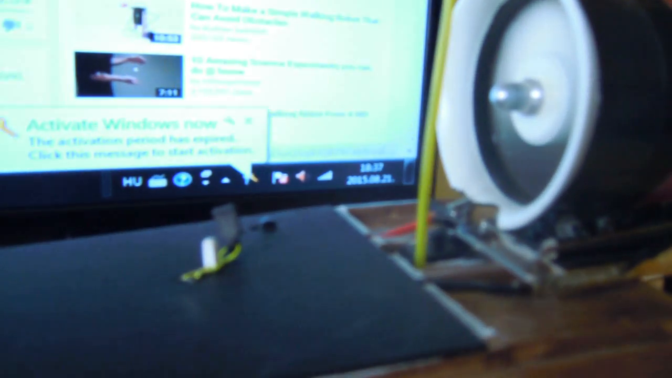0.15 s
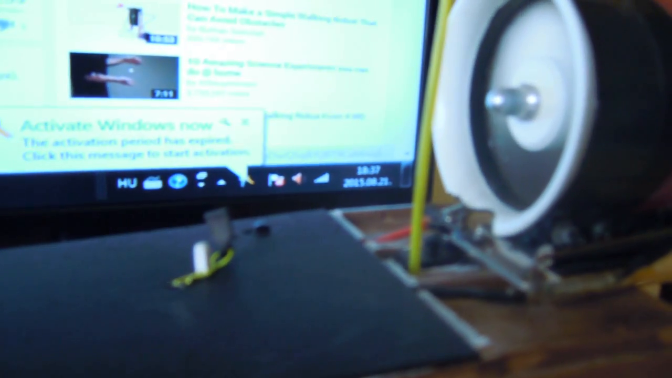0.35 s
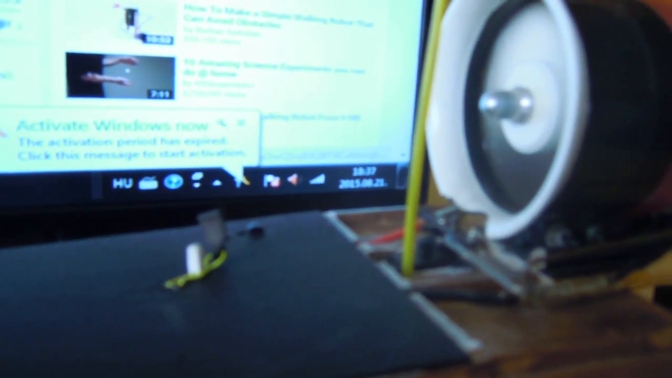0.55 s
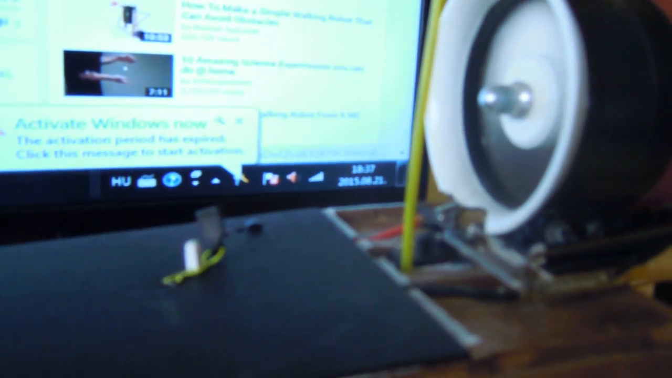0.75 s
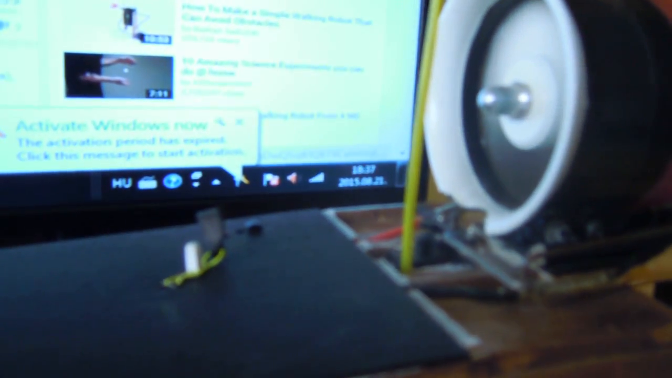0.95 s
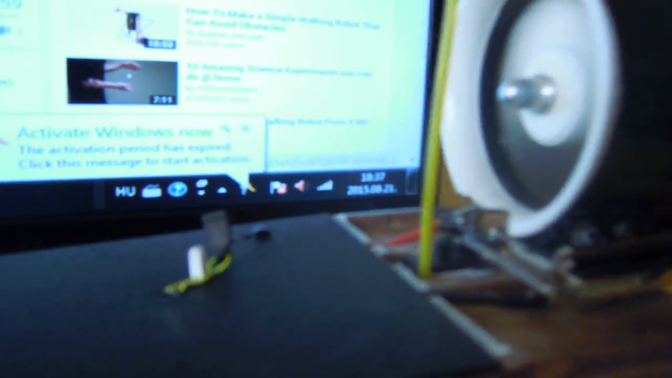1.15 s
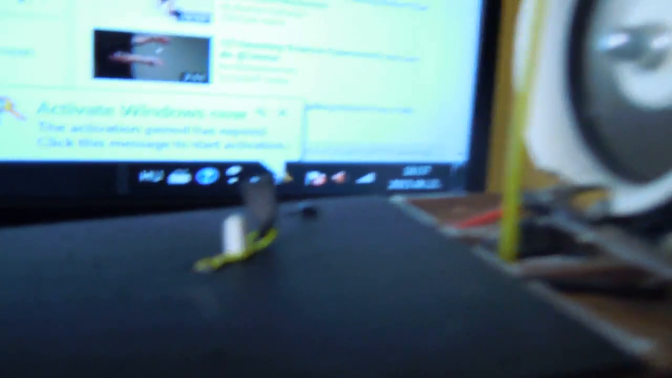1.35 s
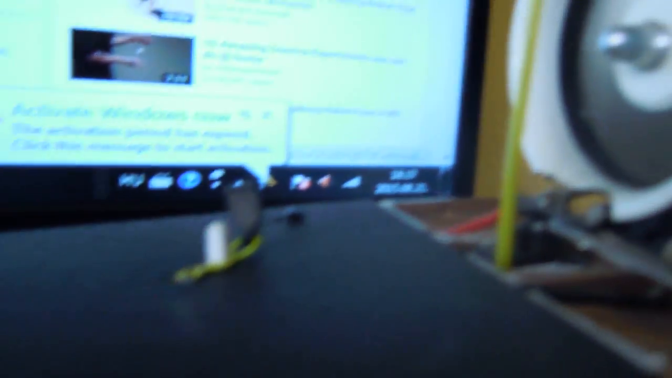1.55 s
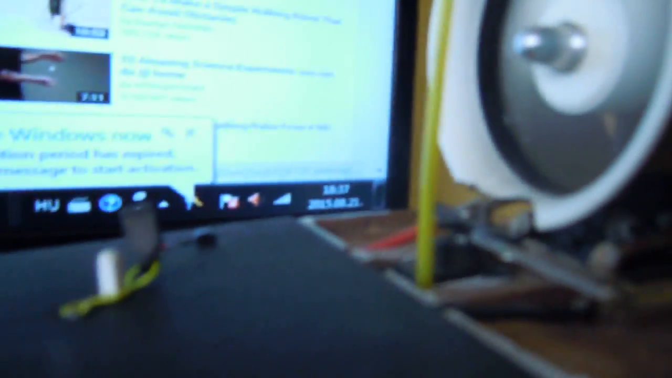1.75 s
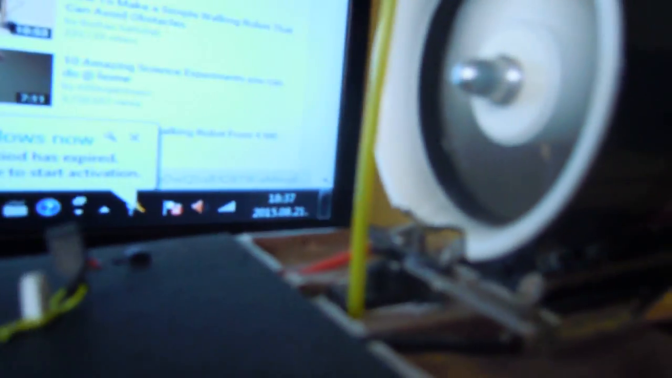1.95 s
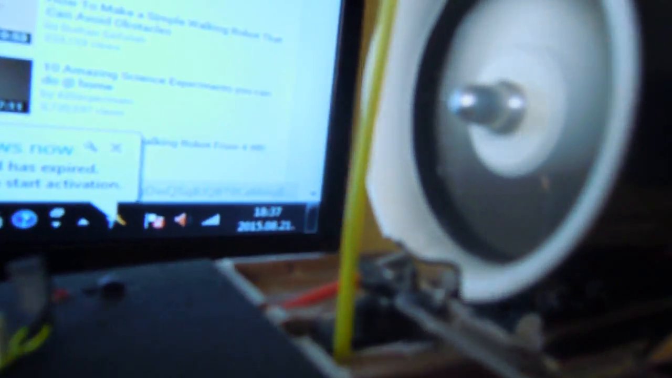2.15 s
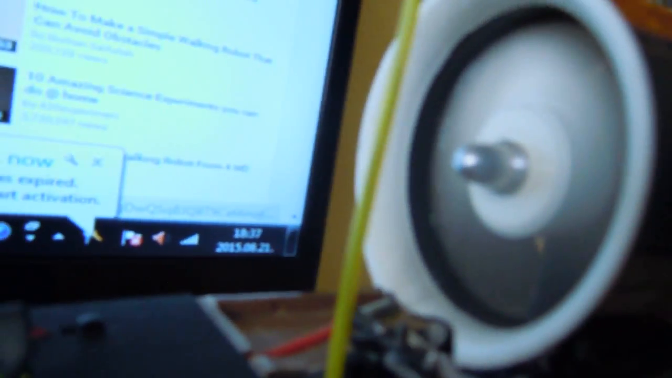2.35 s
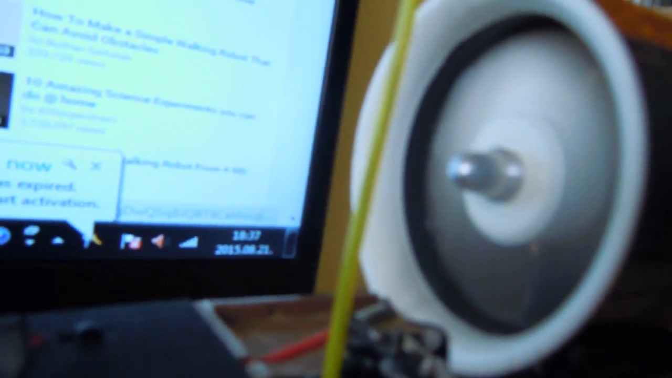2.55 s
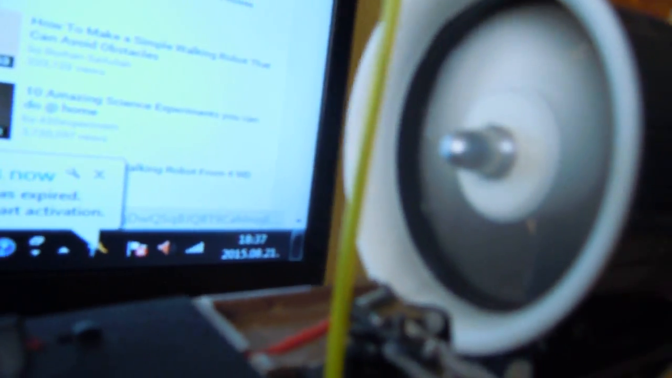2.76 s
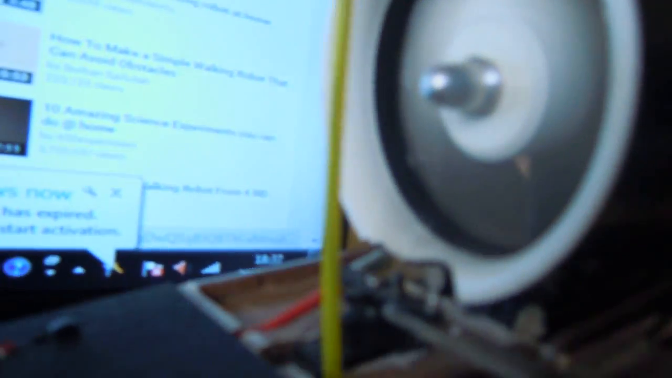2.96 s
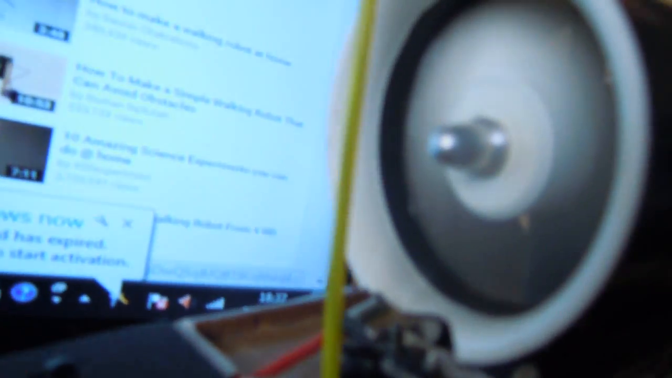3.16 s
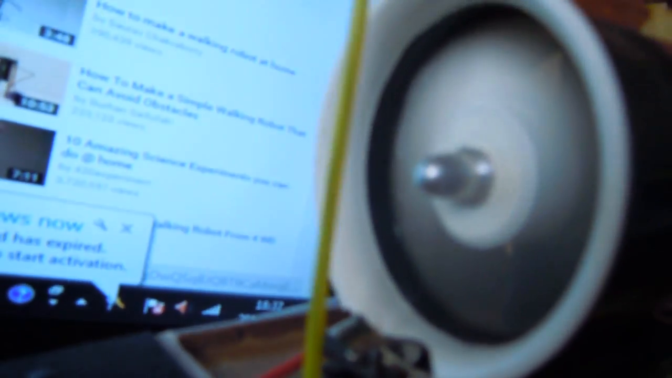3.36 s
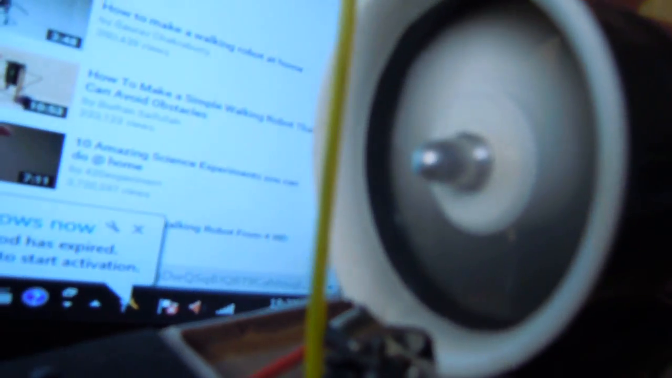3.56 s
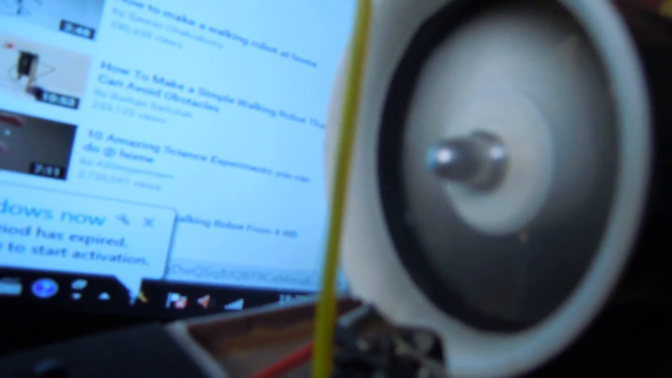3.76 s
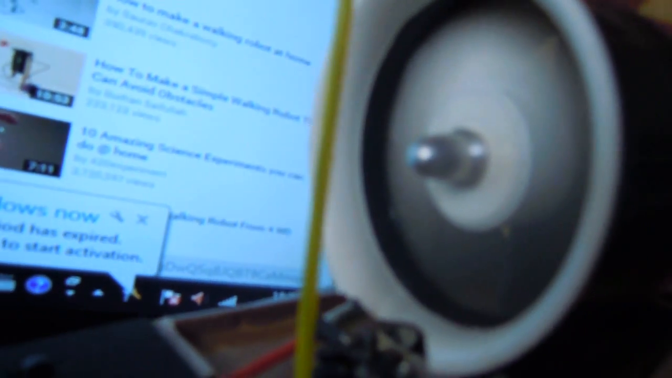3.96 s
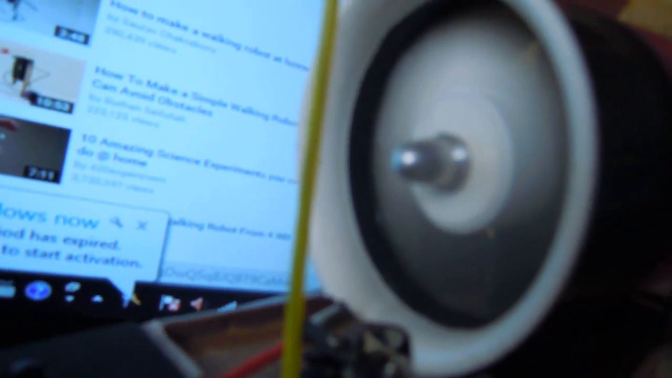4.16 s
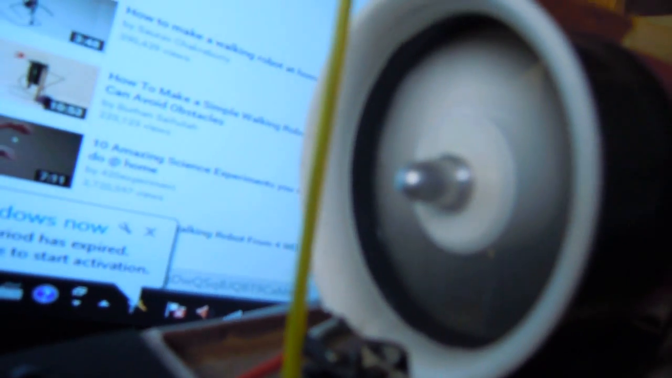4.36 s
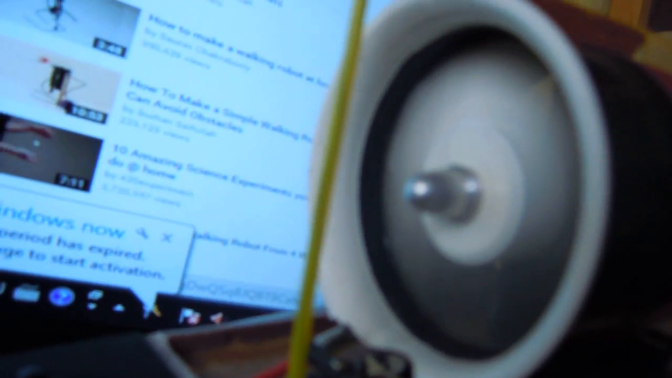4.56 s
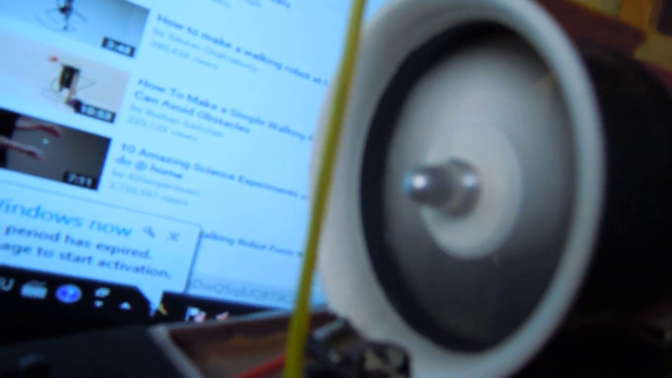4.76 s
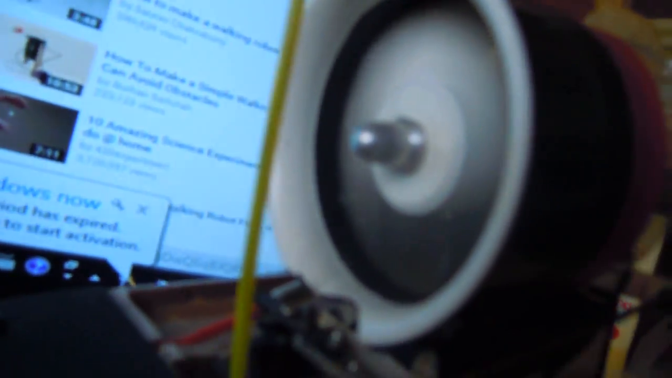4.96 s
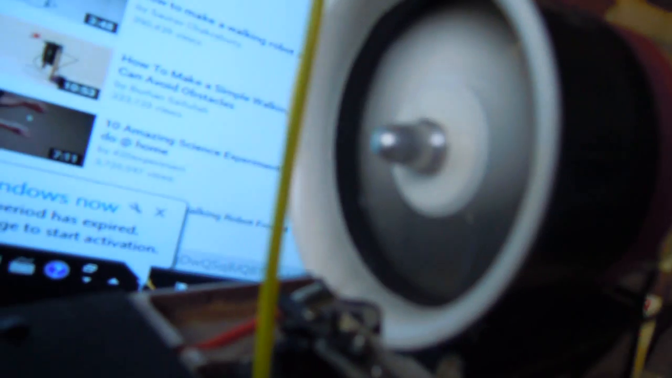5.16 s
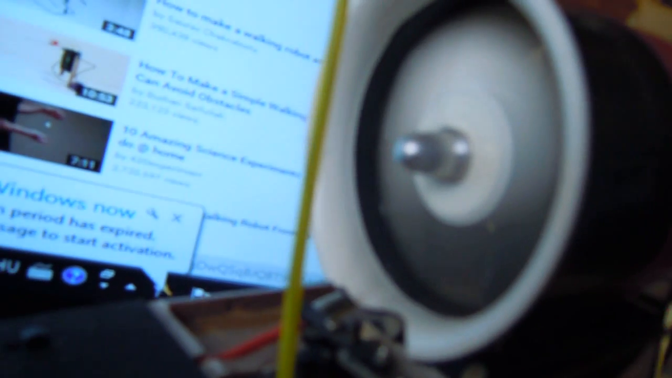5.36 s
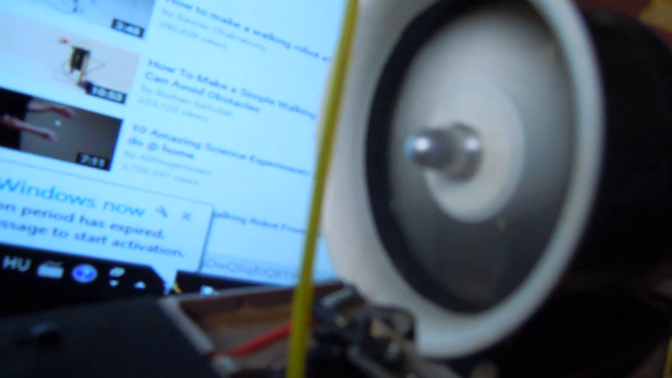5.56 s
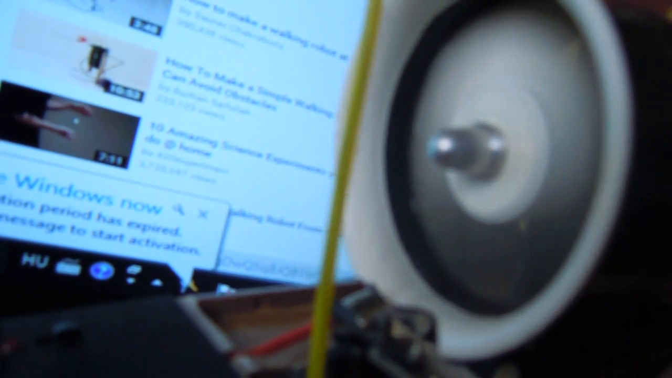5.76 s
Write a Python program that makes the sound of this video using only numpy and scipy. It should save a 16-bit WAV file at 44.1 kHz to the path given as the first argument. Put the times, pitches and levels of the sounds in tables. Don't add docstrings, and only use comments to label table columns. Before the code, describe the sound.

Close, mono, slightly saturated sound of a ducted fan indoors: humming shaft tone, raspy blade buzz and rushing air. The pitch is nearly steady, climbs by about a tenth in total near one second, holds, then leaps by more than a third around 2.7 seconds. The full-speed whirr stays dense and loud, with tiny wavering, faint microphone rumble and one small handling thump.

```python
import sys
import numpy as np
from scipy import signal
from scipy.fft import rfft, irfft, next_fast_len
from scipy.io import wavfile
from scipy.ndimage import uniform_filter1d

SR = 44100
rng = np.random.default_rng(int(sys.argv[2]) if len(sys.argv) > 2 else 0)


def level_to_linear(level):
    exponent = np.asarray(level, float) / 20
    return 10 ** exponent


def int16_out(signal):
    q = np.round(np.clip(np.atleast_2d(signal).T, -1, 1) * 32767)
    wavfile.write(sys.argv[1], SR, q.astype(np.int16))


N = 260190


def rms_one(x):
    return x / np.sqrt(np.mean(x ** 2) + 1e-20)


def in_time(rows):
    s, *columns = np.transpose(rows)
    return [np.interp(np.arange(N) / SR, s, column) for column in columns]


def drift(rate_per_s):
    pole = np.exp(-80 * np.pi * rate_per_s / SR)
    sparse = rng.standard_normal(N // 40 + 2002)
    slow = signal.lfilter([1], [1, -2 * pole, pole * pole], sparse)[2000:]
    return np.interp(np.arange(N) / 40, np.arange(len(slow)), rms_one(slow))


# (time [s], shaft speed [Hz])
THROTTLE = [(0, 189.6), (.33, 190.8), (.4, 193.8), (.55, 194.8), (.87, 195.2), (.93, 201.8), (.97, 203.5),
            (1.07, 213.2), (2.6, 211.1), (2.645, 217.8), (2.7, 253), (2.735, 271.5), (2.77, 281),
            (2.82, 286.6), (2.93, 289), (3.6, 290.6), (5.5, 289.7), (5.9, 287.8)]


def shaft_speed():
    shaft_hz, = in_time(THROTTLE)
    shaft_hz = uniform_filter1d(shaft_hz, size=SR // 70, mode="nearest")
    return shaft_hz + 0.1302 * drift(3.013)


# (centre [Hz], width [Hz], level [dB])
CASING_MODES = [(237.7, 4.5, -5), (266, 3.2, -5), (271, 2.1, 3), (283.5, 3.3, -11), (552, 18.7, 7.5),
                (612, 15.6, 7.5), (690, 12.2, -9), (750, 26, 8.5), (804, 5.6, -18), (839, 21, 10.5),
                (1188, 60, -9.5), (2876, 95, 3.5), (3140, 70, -16), (3967, 98, 13)]


def casing(hz):
    return sum(db * np.exp(-((hz - centre_hz) / width_hz) ** 2) for centre_hz, width_hz, db in CASING_MODES)


PASSING_HZ = (194, 212, 262, 289)
# (multiple of shaft speed, slow [dB], middle [dB], spin-up [dB], fast [dB])
MAIN_ORDERS = [(1, -22, -21, -23.5, -19.5), (2, -41.5, -48, -32.5, -29.5), (3, -48.5, -36, -31.5, -35.5),
               (6, -30, -33, -23, -14), (12, -34, -29.5, -24, -27.5), (18, -42, -44, -41, -24.5),
               (.5, -55.5, -45.5, -52, -43), (1.5, -41.5, -41.5, -42, -36.5), (5, -31.5, -36.5, -32, -32),
               (7, -41.5, -47, -26, -25.5), (9, -40.5, -39, -33, -29.5), (10, -39, -47, -34, -32.5)]


def main_levels(shaft_hz, wobble_db, aim_db, contact_db):
    coarse = slice(None, None, 40)
    stance_db = {.5: contact_db, 1.5: 1.05 * wobble_db, 12: aim_db}
    stance_db[3] = 2.5 * drift(9.7) * np.interp(shaft_hz, [285, 288], [0, 1])
    stance_db[2] = -1.8 * aim_db * np.interp(shaft_hz, [205, 212, 225], [0, 1, 0])
    levels = []
    for multiple, *levels_db in MAIN_ORDERS:
        is_half = round(2 * multiple) % 2
        shape_db = np.interp(shaft_hz[coarse], PASSING_HZ, levels_db)
        shape_db += (1 - is_half) * casing(multiple * shaft_hz[coarse])
        shape_db = np.interp(np.arange(N), np.arange(N)[coarse], shape_db)
        sway_db = (min(0.36 * multiple, 0.5) + is_half * 1.5) * drift(3.7)
        levels.append(shape_db + stance_db.get(multiple, 0) + sway_db)
    return levels


SETTINGS_HZ = (194, 212, 289)
# (multiple of shaft speed, slow [dB], middle [dB], fast [dB])
WEAK_ORDERS = [ (2.5, -43, -49, -41), (3.5, -56, -43, -44.5), (4, -44, -46, -39), (4.5, -41, -63, -67),
               (5.5, -46, -42.5, -63), (7.5, -46, -61, -39), (7.95, -63, -58, -40), (11, -52, -78, -39.5),
               (13, -41, -35, -33), (15, -39, -47, -32), (16, -51, -48, -36.5), (17, -59, -47, -32.5),
               (19, -39.5, -50.5, -53), (20, -58, -57, -31), (21, -52, -42.5, -29.5), (22, -50, -54, -71),
               (23, -50, -41.5, -51), (24, -53, -51, -27), (25, -42, -37.5, -36), (26, -60, -48, -29),
               (27.01, -51, -36, -32), (28, -44, -37, -29), (29, -52, -54, -37), (30, -48, -70, -37),
               (31, -37, -47, -27.5), (32.6, -55, -33.5, -31.5), (34.2, -39, -60, -40)]


def motor(turn, shaft_hz, wobble_db, main_db):
    angle = turn + 0.0085 * drift(14)
    start = rng.uniform(0, 2 * np.pi, 80)
    start[14] = np.pi + 2 * start[12] - start[10]
    start[3] = np.pi + 2 * start[2] - start[1]
    out = np.zeros(N)
    for (multiple, *_), level_db in zip(MAIN_ORDERS, main_db):
        gain = level_to_linear(level_db + 0.017 * multiple * drift(10.0))
        out += gain * np.sin(multiple * angle + start[round(2 * multiple)])
    wavers = [drift(5) for _ in range(7)]
    slips = [drift(15) for _ in range(5)]
    for k, (multiple, *levels_db) in enumerate(WEAK_ORDERS):
        half = round(2 * multiple)
        level_db = np.interp(shaft_hz, SETTINGS_HZ, levels_db)
        level_db += half % 2 * wobble_db + 1.6 * wavers[k % 7]
        slip = 0.0011 * multiple ** 2 * slips[k % 5]
        out += level_to_linear(level_db) * np.sin(half / 2 * angle + start[half] + slip)
    return np.sqrt(2) * out


# (frequency [Hz], slow [dB], middle [dB], fast [dB])
AIR_COLOUR = [(90, -16, -18, -10), (252, -12.5, -14, -8.5), (690, -6, -12.5, -4.5), (1250, -5, -6.5, -5.5),
              (1910, -1, -3.5, -1), (2500, -0.5, -2.5, 0.5), (3000, 0.5, -2.5, 2), (3420, -1, -7.5, -2),
              (5240, 1, 2.5, 4), (5800, 6.5, 4.5, 5.5), (7340, 7.5, 8, 7), (8140, 5, 7, 10),
              (9200, 5.5, 6, 5.5), (10400, 3, 4.5, 7)]


def air(turn, shaft_hz, rush_db, duct_db, patchy_db, throb, blade_throb):
    size = next_fast_len(N)
    spectrum = rfft(rng.standard_normal(size))
    log_hz = np.log(np.arange(size // 2 + 1) * SR / size + 1)
    echo_s, echo_share = 0.000913, 0.065
    spectrum *= 1 - echo_share * np.exp(-2j * np.pi * np.exp(log_hz) * echo_s)
    centres = np.log([row[0] for row in AIR_COLOUR])
    together = drift(0.89)
    pulsing = 1 + throb * np.sin(turn) + .3 * throb * np.sin(turn / 2) + blade_throb * np.sin(6.0 * turn)
    out = np.zeros(N)
    for k, (hz, *levels_db) in enumerate(AIR_COLOUR):
        weight = np.interp(log_hz, centres, np.arange(len(AIR_COLOUR)) == k)
        band = irfft(spectrum * weight, size)[:N]
        treble = np.clip(hz / 5000, 0, 1)
        level_db = np.interp(shaft_hz, SETTINGS_HZ, levels_db) + rush_db + (1 - treble) * duct_db
        level_db += patchy_db * (.5 * together + drift(24))
        out += level_to_linear(level_db) * band * (1 + treble * (pulsing - 1))
    return out


def draught(draught_db):
    band = signal.butter(1, [22, 45], "band", fs=SR, output="sos")
    low = signal.sosfilt(band, rng.standard_normal(N + SR))[SR:]
    low = signal.sosfilt(signal.butter(2, 16, "high", fs=SR, output="sos"), low)
    return level_to_linear(draught_db - 0.5 + 1.3 * drift(9.4)) * rms_one(low)


# (time [s], peak level [dB], body resonance [Hz])
GRIP_SHIFTS = [
    (3.034, -23, 210),
    (3.038, -24, 895),
    (3.088, -21, 750),
    (3.125, -28, 897),
]


def handling():
    out = np.zeros(N)
    t = np.arange(SR // 10) / SR
    puffs = rng.standard_normal((len(GRIP_SHIFTS), len(t)))
    for (s, peak_db, hz), puff in zip(GRIP_SHIFTS, puffs):
        band = signal.butter(1, [0.64 * hz, 2.0 * hz], "band", fs=SR, output="sos")
        body = rms_one(signal.sosfilt(band, puff))
        at = round(s * SR)
        out[at:at + len(t)] += level_to_linear(peak_db) * body * t / 0.0055 * np.exp(1 - t / 0.0063)
    return out


# (time [s], nearness [dB], gust [dB],
# rotor wobble [dB], aim at the blades [dB], desk contact [dB])
STANCE = [(0, 1, 3, 2, -1, 3), (.12, .5, -1, 1, -2, 0), (.5, 0.4, 2, 2, 1.5, 2), (.82, -1, .5, 0.5, -1, .5),
          (1.0, 0.7, .5, 5, 3, -13), (1.12, 1, 3, 5, 2.5, -7), (1.4, 1, .5, 0, 3.5, -1),
          (1.7, 0.2, -2, .5, 0, -2), (2.15, 0.2, .5, .5, 0.5, -1), (2.33, 0.8, -.5, -2.5, -0.5, 4),
          (2.6, -0.5, 3, -4, -3, 3), (2.88, -0.7, -3, 0, 5.5, -4), (3.1, 0.1, 5, -6, 3, -9),
          (3.32, -0.3, -5, 1.5, -2, 4.5), (3.6, -0.1, 5, 0.5, -0.5, 0), (4.1, -0.1, 5, 4, -7, 1.5),
          (5.0, -0.6, -1, 2, 0.5, 1), (5.9, -.2, .5, 6, 1, -2)]
RUSH_DB, DRAUGHT_DB = (-20, -19.5, -14, -13.5), (-56, -55, -53, -47)


def scene():
    shaft_hz = shaft_speed()
    near_db, gust_db, wobble_db, aim_db, contact_db = in_time(STANCE)
    turn = 2 * np.pi * np.cumsum(shaft_hz) / SR
    surge = uniform_filter1d(np.gradient(shaft_hz) * SR * (shaft_hz < SETTINGS_HZ[1]), size=SR // 20)
    duct_db = 0.4 + 0.96 * drift(5.5) + 0.0377 * surge
    rush_db = np.interp(shaft_hz, PASSING_HZ, RUSH_DB) + near_db
    rush = air(turn, shaft_hz, rush_db, duct_db, patchy_db=0.4, throb=0.14, blade_throb=0.02)
    tones = motor(turn, shaft_hz, wobble_db, main_levels(shaft_hz, wobble_db, aim_db, contact_db))
    rumble = draught(np.interp(shaft_hz, PASSING_HZ, DRAUGHT_DB) + gust_db)
    return (tones + rush + rumble + handling())[None]


def band_limit(x):
    return signal.sosfilt(signal.butter(12, 11500, fs=SR, output="sos"), x)


def record(dry):
    clip_level, edge_hz, shelf_db = .67, 10600, -22
    x = signal.sosfiltfilt(signal.butter(12, 12200, fs=SR, output="sos"), dry)
    x = clip_level * x / (clip_level ** 6 + x ** 6) ** (1 / 6)
    low = signal.sosfiltfilt(signal.butter(18, edge_hz, fs=SR, output="sos"), x)
    mix = low + level_to_linear(shelf_db) * (x - low)
    return band_limit(mix)


dry = scene()
out = record(dry)
int16_out(out)
```